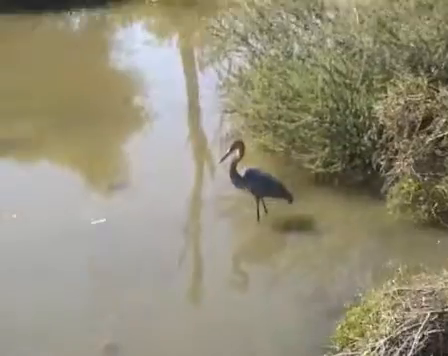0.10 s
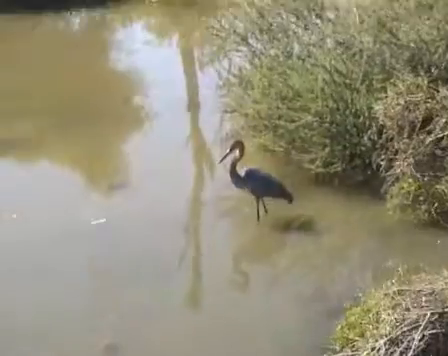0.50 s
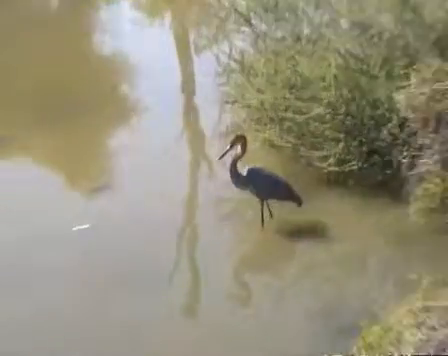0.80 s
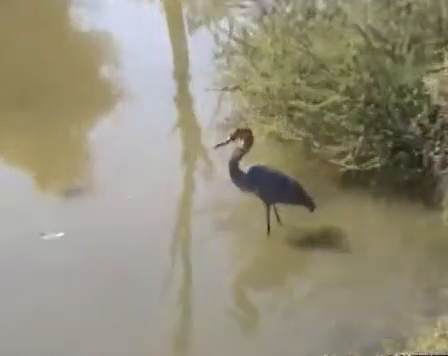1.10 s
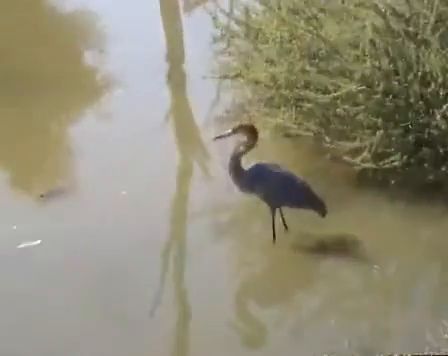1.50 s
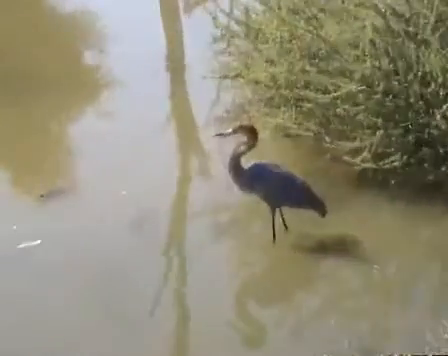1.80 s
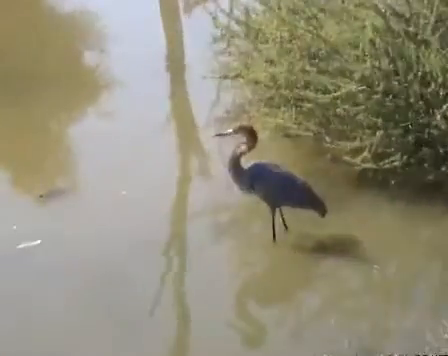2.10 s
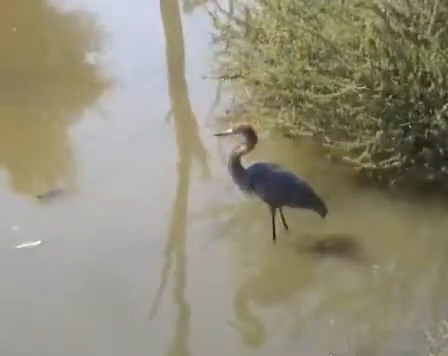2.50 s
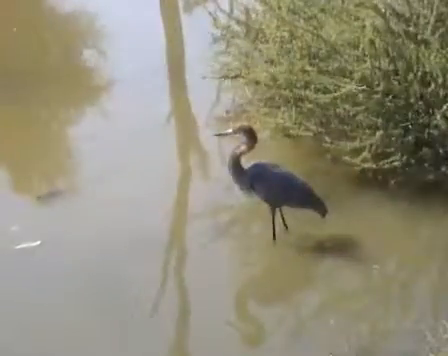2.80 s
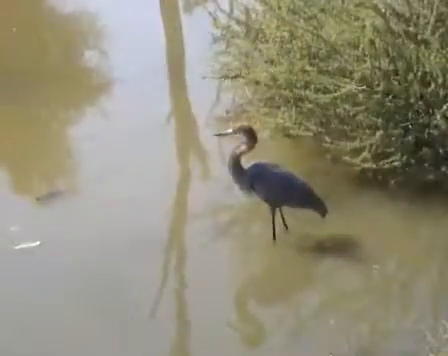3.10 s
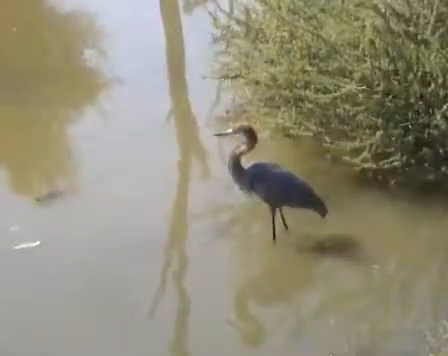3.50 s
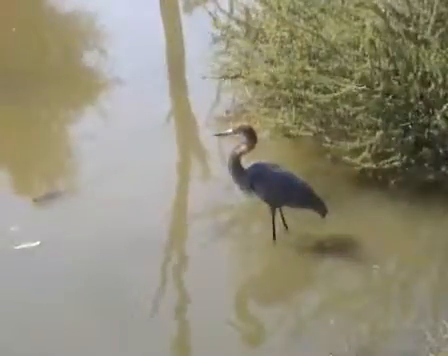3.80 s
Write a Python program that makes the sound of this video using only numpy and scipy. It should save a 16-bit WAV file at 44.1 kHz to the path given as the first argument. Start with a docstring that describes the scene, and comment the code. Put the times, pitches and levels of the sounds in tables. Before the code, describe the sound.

Loud overlapping bird cries, yelping and whistling in short groups, echo beside a quiet pond

```python
"""Fish eagles across still water

Two eagles call, often over each other: low arching yelps and high sagging whistles, sines with harmonics.
Noise tails echo them off the banks; small birds twitter (noisy sine) and rasp (throbbing noise bands).
Below lie hissing noise bands, mains hum, ringing bubbles, wind and a few damped ticks.
The recorder overloads on the loudest notes and drops out three times."""
import sys
import numpy as np
from scipy import signal
from scipy.io import wavfile
from scipy.ndimage import uniform_filter1d

SR = 44100
rng = np.random.default_rng(int(sys.argv[2]) if len(sys.argv) > 2 else 0)


def digitize_waveform(pressure):
    """Quantize a signal to 16-bit integers and store it at the path in sys.argv[1].

    Rows of a 2-D input are taken as channels; values are limited to [-1, 1].
    """
    field = np.atleast_2d(pressure).T
    bounded = np.clip(field, -1, 1)
    quanta = np.round(bounded * 32767).astype(np.int16)
    wavfile.write(sys.argv[1], SR, quanta)


N = 176400

# hoarse glides, rising into a whistle or falling out of a yelp:
# start/s, length/s, from f/Hz, to f/Hz, from level/dB, to level/dB
GLIDES = [(.0, 0.032, 1390, 1499, -26.5, -19), (0.604, 0.045, 1267, 1491, -42.5, -19.5),
          (1.407, 0.03, 1242, 1381, -25, -33), (2.613, 0.039, 1218, 1410, -27.5, -32.5),
          (3.904, 0.037, 1206, 1471, -37, -24), (0.71, 0.043, 988, 697, -40, -39),
          (1.519, 0.039, 1035, 749, -32.5, -40), (2.703, 0.036, 853, 651, -35, -47)]
EDGE_S, SCOOP_S = 0.0047, 0.013
BREATH_DB = -35   # phase and amplitude noise re 1
GLIDE_SECOND_DB = -13   # second harmonic re fundamental
FOURTH_DB = -7.5   # fourth harmonic re third


def from_db(db):
    """Amplitude ratio of a level in dB."""
    return 10 ** (np.asarray(db) / 20)


def rms_one(x):
    """Signal scaled to unit rms."""
    return x / np.sqrt(np.mean(x ** 2) + 1e-20)


def band(x, low_hz, high_hz, order=2):
    """Butterworth band-pass."""
    return signal.sosfilt(signal.butter(order, [low_hz, high_hz], "band", fs=SR, output="sos"), x)


def two_pole_noise(length, r):
    """White noise through a double real pole."""
    return signal.lfilter([1], [1, -2 * r, r * r], rng.standard_normal(length))


def drift(rate_hz):
    """Slow random signal of unit rms, made at SR / 40 and interpolated."""
    r = np.exp(-80 * np.pi * rate_hz / SR)
    slow = two_pole_noise(N // 40 + 2002, r)[2000:]   # settling dropped
    return np.interp(np.arange(N) / 40, np.arange(len(slow)), rms_one(slow))


def add_note(out, rows, upper_db=(), breath_db=BREATH_DB, crack_db=-99, attack_s=EDGE_S):
    """Sines on the pitch curve: a breathy skirt, fluttering harmonics and a cracked, noisy start."""
    breath_corner_hz, crack_s = 212, 0.04
    crack_bright = 7.3   # extra harmonics in the crack
    dulling_db_per_oct = 50.5   # harmonics fade as pitch sags past its peak
    blur_rad, full_blur_hz_per_s = 1.1, 2200   # harmonic phase wander, full at this glide speed
    s, hz, db = np.transpose(rows)
    i = np.arange(int(max(s[0], 0) * SR), min(int(s[-1] * SR), N))
    t = i / SR
    pitch_hz = uniform_filter1d(np.interp(t, s, hz), size=500, mode="nearest")
    level_db = np.interp(t, s, db)

    crack = from_db(crack_db) * np.exp(-((t - s[0]) / crack_s) ** 2)
    r = np.exp(-2 * np.pi * breath_corner_hz / SR)
    phase_noise = rms_one(two_pole_noise(len(i), r))
    level_noise = rms_one(two_pole_noise(len(i), r))
    rough = from_db(breath_db) + crack
    phase = 2 * np.pi * np.cumsum(pitch_hz) / SR + rough * phase_noise
    half_pitch_lines = 0.4 * np.sin(phase / 2) + np.sin(1.5 * phase)
    wave = from_db(level_db) * (np.sin(phase) + crack * half_pitch_lines)

    gliding = np.clip(np.abs(np.gradient(pitch_hz)) * SR / full_blur_hz_per_s, 0, 1)
    after_peak = np.arange(len(i)) > pitch_hz.argmax()
    sag_db = dulling_db_per_oct * np.log2(pitch_hz / hz.max()) * after_peak
    # brief dips of the fundamental spare the harmonics
    even_db = uniform_filter1d(level_db, size=2600, mode="nearest") + sag_db
    flutter_db = 0.99 + 4.125 * gliding
    for k, below_db in enumerate(upper_db):
        flutter = from_db(flutter_db * drift(44)[i]) * (1 + crack_bright * crack)
        blur = blur_rad * (k + 1) * gliding * drift(44)[i]
        wave += from_db(even_db + below_db) * flutter * np.sin((k + 2) * phase + k + blur)

    fade = np.clip(np.minimum((t - s[0]) / attack_s, (s[-1] - t) / EDGE_S), 0, 1)
    out[i] += np.sqrt(2) * fade * (1 + rough * level_noise) * wave


def high_eagle():
    """Sagging whistles; each begins faintly above a hoarse rising glide and climbs with it, the glide lingering
    under the whistle."""
    # one table a whistle or after-note: t/s, f/Hz, level/dB
    whistles = [
        [(0.036, 1763, -27.5), (0.042, 1790, -17), (0.088, 1767, -15.5), (0.14, 1698, -18),
         (0.148, 1659, -27.5), (0.176, 1680, -16.5), (0.198, 1570, -18), (0.216, 1515, -28), (0.234, 1519, -17),
         (0.262, 1374, -29.5), (0.284, 1313, -27.5), (0.292, 1260, -37)],
        [(0.657, 1775, -26.5), (0.667, 1807, -17), (0.703, 1788, -23.5), (0.729, 1769, -15),
         (0.767, 1674, -24.5), (0.783, 1693, -17.5), (0.795, 1550, -22.5), (0.831, 1448, -23),
         (0.852, 1468, -21.5)],
        [(0.855, 1490, -13.5), (0.871, 1599, -29), (0.913, 1488, -29.5), (0.925, 1536, -49.5)],
        [(1.44, 1590, -26), (1.457, 1632, -18), (1.509, 1645, -19), (1.543, 1620, -15.5), (1.575, 1550, -17.5),
         (1.604, 1505, -25)],
        [(1.6, 1764, -31), (1.624, 1742, -22), (1.66, 1665, -27.5), (1.68, 1672, -26.5), (1.698, 1556, -24),
         (1.708, 1503, -58)],
        [(2.638, 1591, -30), (2.655, 1624, -20), (2.7, 1629, -20.5), (2.78, 1618, -20.5), (2.85, 1636, -24.5),
         (2.9, 1584, -16.5), (2.94, 1566, -20), (2.958, 1525, -31), (2.985, 1511, -34.5)],
        [(3.938, 1691, -34), (3.956, 1687, -17.5), (3.98, 1682, -21.5), (4.01, 1706, -19.5)],
    ]
    # one row a whistle, re fundamental: second harmonic/dB, third harmonic/dB
    whistle_harmonics = [(-17.5, -23.5), (-22.5, -24), (-40, -42.5), (-16.5, -24), (-32.5, -49.5),
                         (-16, -21.5), (-19.5, -19)]
    hoarse_db = -12
    whistle_start_ratio, whistle_start_db = 1.2, -32.5   # faint start of the whistle, rising above the glide
    linger_s, linger_db = 0.042, -13
    out = np.zeros(N)
    for rows, upper_db in zip(whistles, whistle_harmonics):
        add_note(out, rows, upper_db)
    for s, length, a_hz, b_hz, a_db, b_db in GLIDES:
        if b_hz < a_hz:
            continue
        end_s = s + length
        lower = [(s, a_hz, a_db), (end_s, b_hz, b_db), (end_s + linger_s, b_hz, b_db + linger_db)]
        upper = [(s, a_hz * whistle_start_ratio, whistle_start_db), (end_s, b_hz * whistle_start_ratio, whistle_start_db)]
        for rows in (lower, upper):
            add_note(out, rows, (GLIDE_SECOND_DB,), hoarse_db, attack_s=SCOOP_S)
    return out


def low_eagle():
    """Arching yelps, scooped up from below with a cracked start; hoarse falling glides; a rough yelp end at first."""
    # one table a yelp: t/s, f/Hz, level/dB
    yelps = [
        [(0.4, 961, -38.5), (0.414, 1007, -31.5), (0.434, 1189, -24.5), (0.45, 1215, -25.5), (0.476, 1230, -16),
         (0.52, 1159, -32), (0.532, 1110, -21.5), (0.54, 1086, -33.5), (0.556, 1046, -23), (0.578, 968, -33.5),
         (0.592, 988, -30), (0.615, 984, -42)],
        [(0.65, 992, -33.5), (0.666, 996, -40.5), (0.68, 1071, -29), (0.692, 1124, -28.5), (0.714, 1014, -20),
         (0.718, 1030, -32)],
        [(1.224, 980, -27.5), (1.248, 1127, -32), (1.27, 1184, -17), (1.288, 1188, -15), (1.32, 1157, -24.5),
         (1.326, 1121, -27.5), (1.336, 1104, -18), (1.344, 1078, -30), (1.364, 1036, -21), (1.382, 992, -29.5),
         (1.46, 987, -43)],
        [(1.462, 1022, -31.5), (1.474, 1157, -34), (1.496, 1130, -21), (1.508, 1086, -24.5),
         (1.516, 1026, -19.5), (1.522, 1017, -25)],
        [(2.3, 929, -35.5), (2.318, 982.6, -34.5), (2.338, 1074, -25), (2.362, 1111, -32), (2.376, 1109, -26),
         (2.446, 975, -24), (2.472, 932, -37.5), (2.492, 918, -28), (2.516, 908, -33.5), (2.546, 905, -24.5),
         (2.59, 919.7, -32.5), (2.612, 935.6, -26), (2.658, 936.5, -25), (2.672, 906, -32), (2.71, 868, -30.5)],
        [(3.66, 890, -33.5), (3.685, 1022, -27), (3.703, 1082, -30), (3.723, 1094, -21.5), (3.761, 1083, -22.5),
         (3.778, 1040, -27.5), (3.788, 1030, -19), (3.8, 980, -25), (3.811, 966, -24.5), (3.825, 933, -37),
         (3.833, 949.5, -28), (3.853, 882, -42), (3.861, 832, -31), (3.881, 882, -34), (4.01, 919, -24)],
    ]
    # one row a yelp, re fundamental: second harmonic/dB, third harmonic/dB
    yelp_harmonics = [(-10, -19.5), (-19.5, -20.5), (-13.5, -22.5), (-27.5, -43), (-12, -20), (-17, -21.5)]
    # rough end of a short yelp at the start, with its weak echo line: t/s, f/Hz, level/dB
    yelp_and_echo = [(0, 1023, -24), (0.029, 1012, -48.5), (0.069, 1040, -46), (0.139, 1060, -45),
                     (.34, 1038, -54)]
    scoop_ratio, scoop_db = 0.82, -5
    short_s, short_hoarse_db = 0.1, -12   # yelps cut short are hoarser
    out = np.zeros(N)
    for rows, (second_db, third_db) in zip(yelps, yelp_harmonics):
        s, hz, db = rows[0]
        scooped = [(s - SCOOP_S, hz * scoop_ratio, db + scoop_db)] + list(rows)
        upper_db = (second_db, third_db, third_db + FOURTH_DB)
        breath_db = short_hoarse_db if rows[-1][0] - s < short_s else BREATH_DB
        add_note(out, scooped, upper_db, breath_db, crack_db=-11, attack_s=0.016)
    add_note(out, yelp_and_echo, breath_db=-6)
    for s, length, a_hz, b_hz, a_db, b_db in GLIDES:
        if b_hz < a_hz:
            add_note(out, [(s, a_hz, a_db), (s + length, b_hz, b_db)], (GLIDE_SECOND_DB,), breath_db=-2)
    return out


def small_birds():
    """A thin breathy whistle, and rasps: throbbing band noise under cosine-squared windows."""
    # falling whistle: t/s, f/Hz, level/dB
    twitter = [(1.769, 4146, -54), (1.81, 4166, -49.5), (1.847, 4140, -43.5), (1.879, 3744, -50),
               (1.93, 3193, -44.5), (1.972, 3144, -50), (2.031, 3285, -38), (2.067, 3140, -50)]
    # rasping chirps: middle t/s, half-length/s, centre f/Hz, width/Hz, level before window/dB
    rasps = [(0.235, 0.059, 4120, 1145, -31), (0.367, 0.059, 3360, 366, -40.5),
             (0.611, 0.1, 4196, 703, -42), (0.7, 0.053, 4050, 1125, -29), (.93, 0.072, 3340, 447, -39.5),
             (0.762, 0.042, 3366, 507, -41.5), (1.606, 0.056, 3350, 590, -43.5),
             (1.763, 0.065, 3260, 379.3, -43), (2.155, 0.059, 4240, 1438, -42),
             (2.278, 0.051, 2750, 1002, -48), (2.42, 0.11, 5200, 1190, -48.5),
             (3.046, 0.062, 4170, 1015, -42.5), (3.272, 0.052, 2853, 711.5, -44.5),
             (3.429, 0.092, 4800, 2090, -49.5), (3.792, 0.068, 4450, 530, -39),
             (0.009, 0.055, 4260, 2040, -38), (1.415, 0.039, 2980, 603, -41)]
    throb_hz, throb_depth = 180, 0.45
    out, t = np.zeros(N), np.arange(N) / SR
    add_note(out, twitter, breath_db=-5)
    throb = 1 + throb_depth * np.sin(2 * np.pi * throb_hz * t + 2 * drift(24))
    for s, half_s, hz, width_hz, db in rasps:
        i = slice(max(int((s - half_s) * SR), 0), int((s + half_s) * SR))
        white = rng.standard_normal(len(t[i]))
        noise = rms_one(band(white, hz - width_hz / 2, hz + width_hz / 2, order=3))
        window = np.cos(np.pi / 2 * (t[i] - s) / half_s) ** 2
        out[i] += from_db(db) * noise * throb[i] * window
    return out


def banks(x, level_db, bright):
    """Diffuse echo: a dying noise tail after a short delay, swelling late; a comb thins the lows."""
    delay_s, t60_s = 0.025, 0.99
    far_bank_s, far_spread_s, far_bank_db = 0.32, 0.099, -3
    t = np.arange(int(1.5 * SR)) / SR
    onset = np.clip(t / delay_s - 1, 0, 1)
    tail = rng.standard_normal(len(t)) * from_db(-60 * t / t60_s) * onset
    tail *= 1 + from_db(far_bank_db) * np.exp(-((t - far_bank_s) / far_spread_s) ** 2)
    for _ in range(2):
        tail = signal.lfilter([1, 0, 0, 0, 0, 0, -np.clip(bright, 0, 1)], [1], tail)
    return from_db(level_db) * signal.fftconvolve(x, tail / np.sqrt(np.sum(tail ** 2)))[:N]


def air():
    """Half-octave noise bands that flicker, partly together, plus steady mains hum."""
    # noise spectrum: f/Hz, relative density/dB
    spectrum = [(15, -31), (25, 4), (153, -16), (209, -11), (657, 0.5), (1140, -5.5), (2390, -7.5),
                (3250, -8.5), (4650, -11.5), (6350, -5.5), (7500, -34), (9750, -75)]
    # mains hum: f/Hz, rms level/dB
    hum_lines = [(50, -71), (150.5, -58.5), (251, -63.5)]
    air_db = -47.5
    out, together = 0, drift(1.5)
    edges_hz = 22 * 2 ** np.arange(0, 8.6, 0.5)
    white = rng.standard_normal((2, N))
    hz, db = np.transpose(spectrum)
    for k, (low_hz, high_hz) in enumerate(zip(edges_hz, edges_hz[1:])):
        density_db = np.interp(np.log(low_hz * high_hz) / 2, np.log(hz), db)
        flicker_db = 2.25 * together + 5 * drift(9)
        # neighbouring bands use different noise
        out = out + from_db(density_db + flicker_db) * band(white[k % 2], low_hz, high_hz)
    t = np.arange(N) / SR
    hum = sum(np.sqrt(2) * from_db(d) * np.sin(2 * np.pi * f * t) for f, d in hum_lines)
    return from_db(air_db) * rms_one(out) + hum


def water_and_wind():
    """Small bubbles at the water's edge, damped two-pole rings; lumpy low noise of wind on the microphone."""
    bubbles_per_s, bubble_db, wind_db = 49, -56.5, -63.5
    cycles_per_t60 = 25
    chance = bubbles_per_s * from_db(3.5 * drift(2.5)) / SR
    born = (rng.random(N) < chance) * from_db(5.9 * rng.standard_normal(N))
    pitch_index, rings = rng.integers(0, 8, N), 0
    for k, hz in enumerate(np.geomspace(420, 800, 8)):
        r = from_db(-60 * hz / cycles_per_t60 / SR)
        w = 2 * np.pi * hz / SR
        hits = born * (pitch_index == k) + 1e-18
        rings = rings + signal.lfilter([0, np.sin(w)], [1, -2 * r * np.cos(w), r * r], hits)
    wind = rms_one(band(rng.standard_normal(N), 17, 83) * from_db(7 * drift(4)))
    return from_db(bubble_db) * band(rings, 500, 1000) + from_db(wind_db) * wind


def ticks():
    """Ticks and drips: exponentially damped sines."""
    # t/s, peak level/dB, f/Hz, t60/s
    tick_rows = [(1.643, -39, 4560, .006), (2.093, -35, 600, .02), (3.279, -48, 2500, 0.002),
                 (3.41, -35.5, 520, 0.024)]
    out, t = np.zeros(N), np.arange(2000) / SR
    for s, db, hz, t60_s in tick_rows:
        start = int(s * SR)
        out[start:start + 2000] += from_db(db - 60 * t / t60_s) * np.sin(2 * np.pi * hz * t)
    return out


def scene():
    """Birds with their bank echoes over air, water, wind and ticks; one channel."""
    high = high_eagle() + small_birds()
    low = low_eagle()
    echoes = banks(high, level_db=-12.5, bright=0.45) + banks(low, level_db=-13, bright=0.12)
    return (high + low + echoes + air() + water_and_wind() + ticks())[None]


def record(dry):
    """Narrow, uneven input stage, hard-kneed overload, small offset, dropouts, top cut."""
    # silences: from t/s, to t/s
    dropouts = [(2.7953, 2.8053), (2.8112, 2.8343), (3.5085, 3.6)]
    input_cut_hz, top_cut_hz = 7400, 16400   # stop-band edges
    skew, offset = 0.43, 0.0046   # skew: share of the squared signal
    overload, knee = 0.238, 16
    x = signal.sosfilt(signal.cheby2(10, 45, input_cut_hz, fs=SR, output="sos"), dry)
    squared = signal.sosfilt(signal.butter(1, 25, "high", fs=SR, output="sos"), x ** 2)
    x = x + skew * squared + offset
    x = x / (1 + np.abs(x / overload) ** knee) ** (1 / knee)
    t = np.arange(N) / SR
    for start_s, end_s in dropouts:
        x = x * ((t < start_s) | (t > end_s))
    return signal.sosfilt(signal.cheby2(12, 70, top_cut_hz, fs=SR, output="sos"), x)


dry = scene()
out = record(dry)
digitize_waveform(out)
```